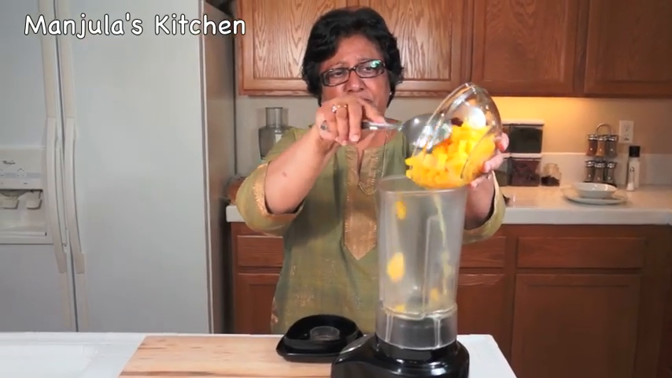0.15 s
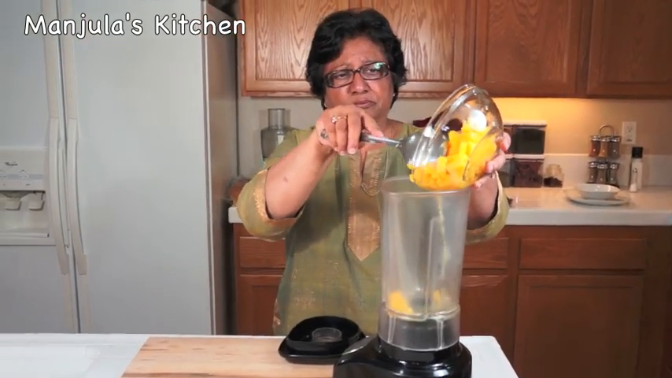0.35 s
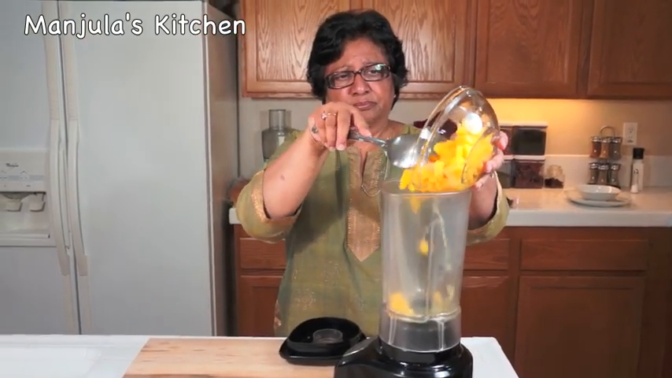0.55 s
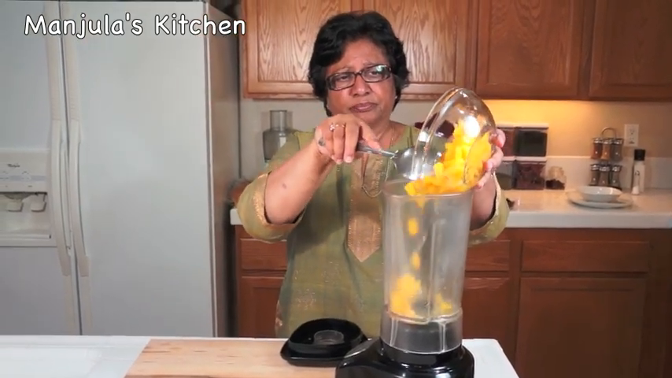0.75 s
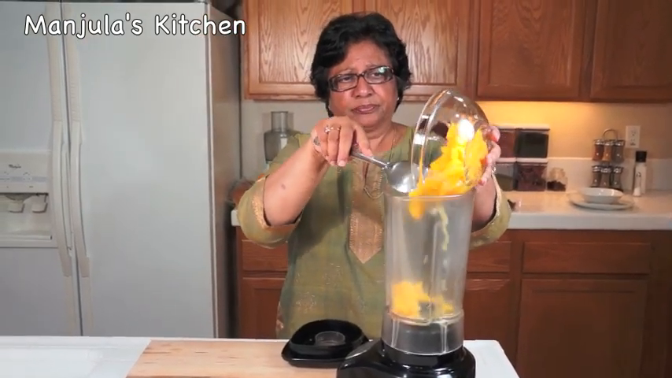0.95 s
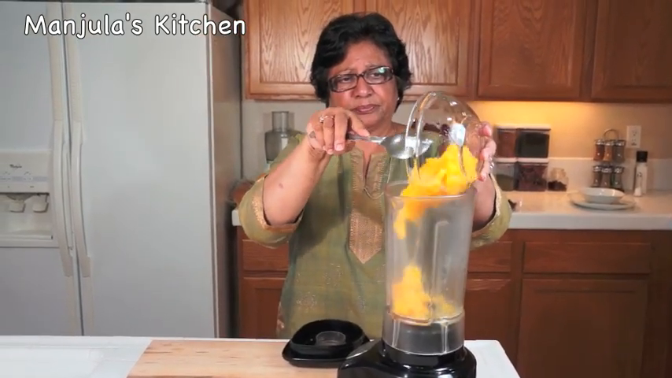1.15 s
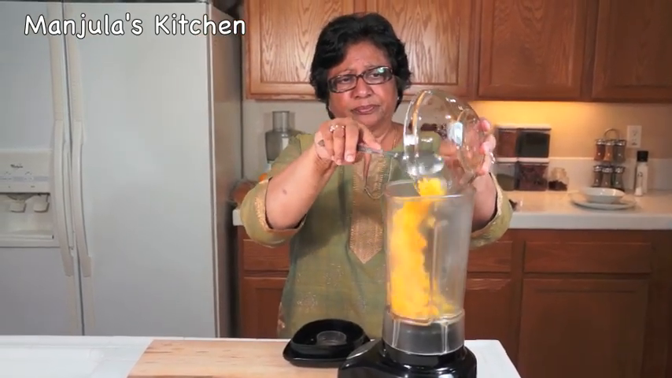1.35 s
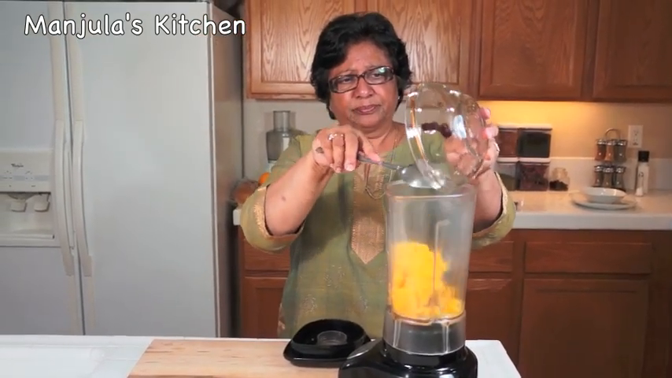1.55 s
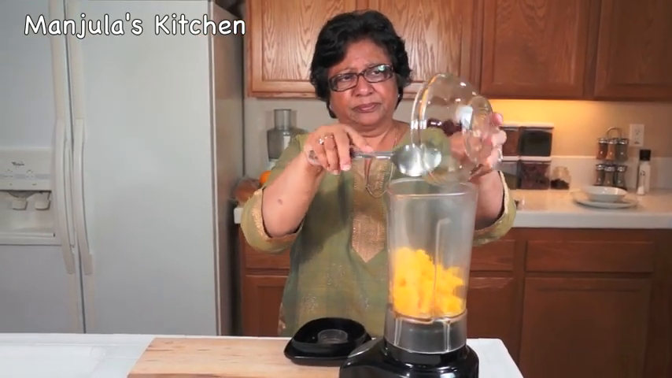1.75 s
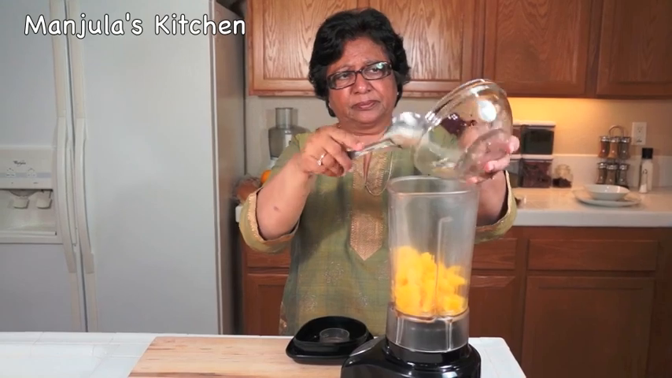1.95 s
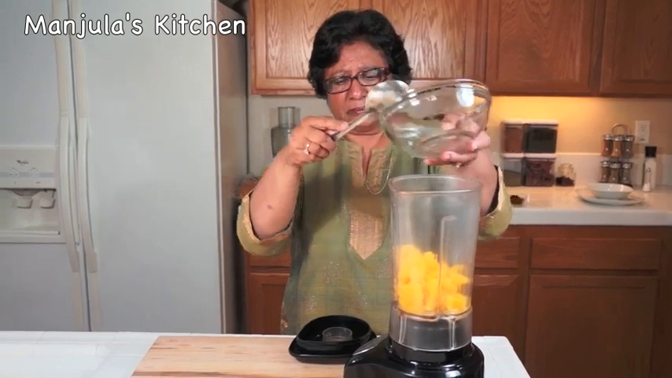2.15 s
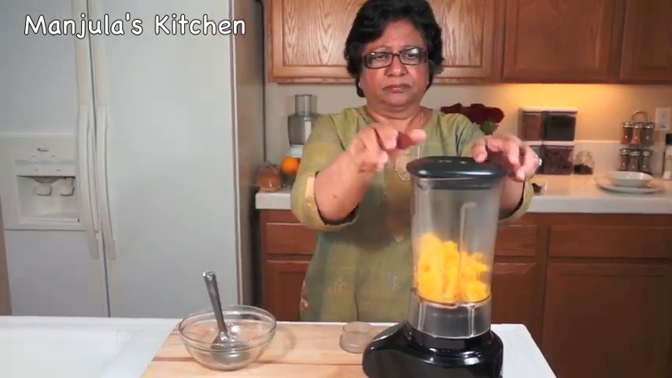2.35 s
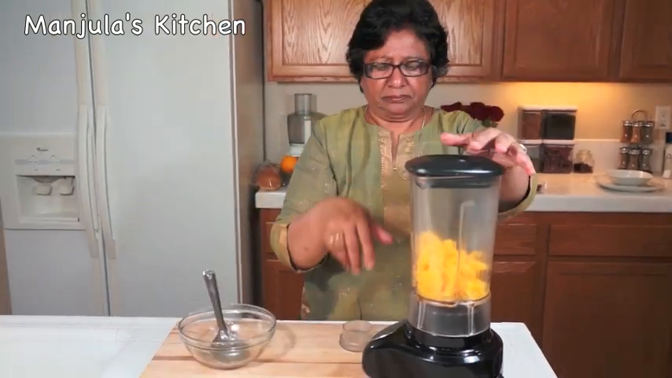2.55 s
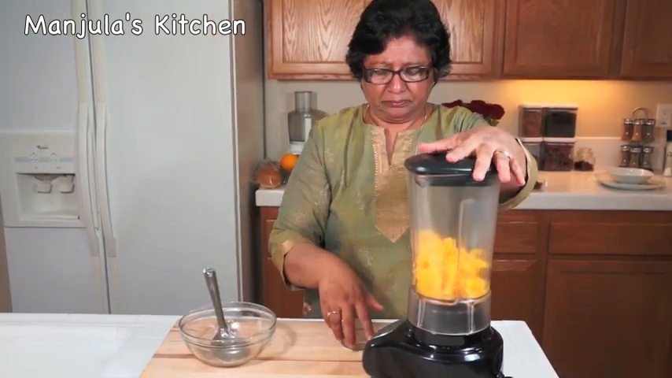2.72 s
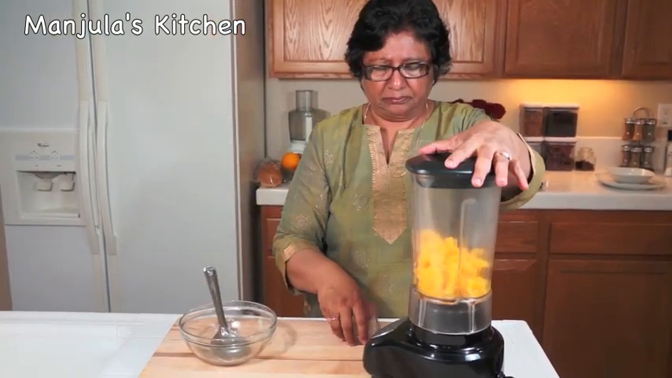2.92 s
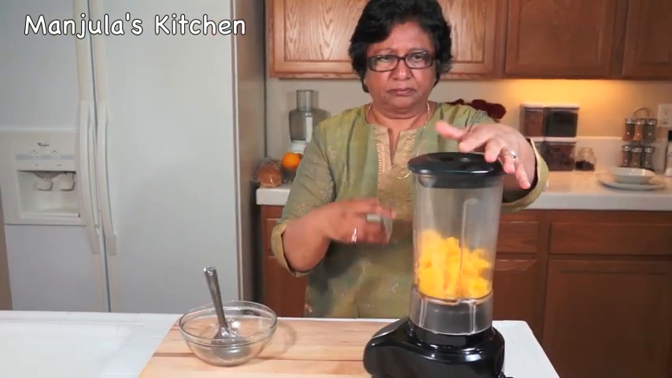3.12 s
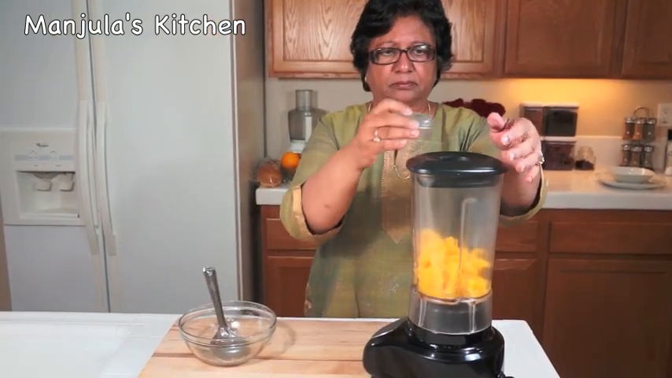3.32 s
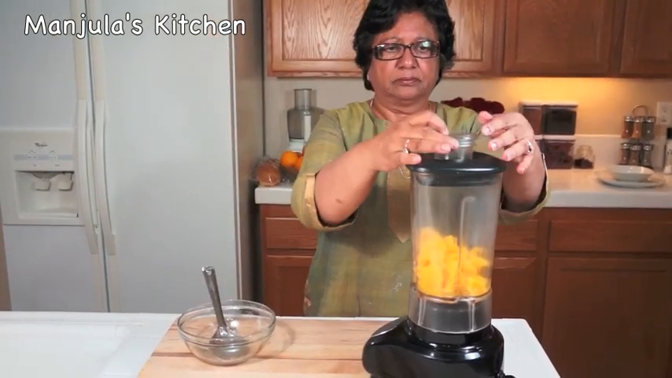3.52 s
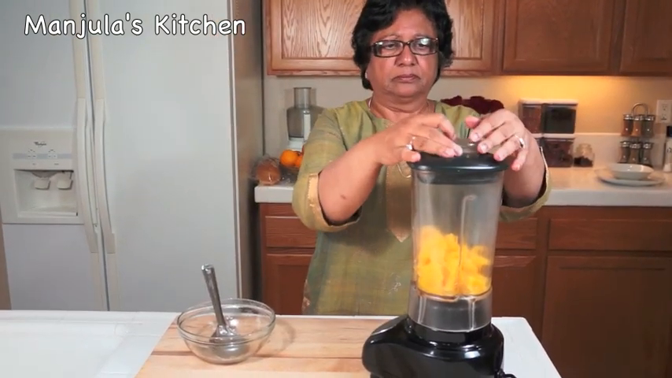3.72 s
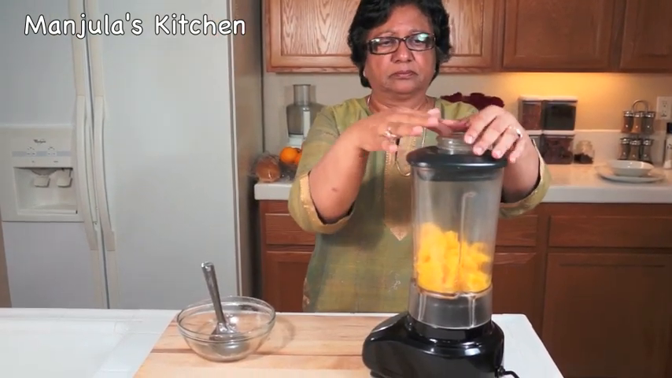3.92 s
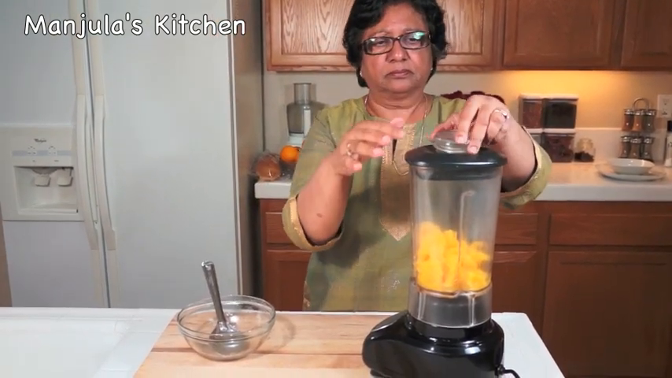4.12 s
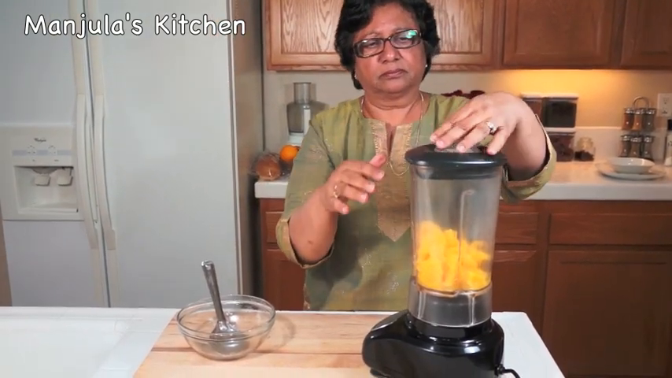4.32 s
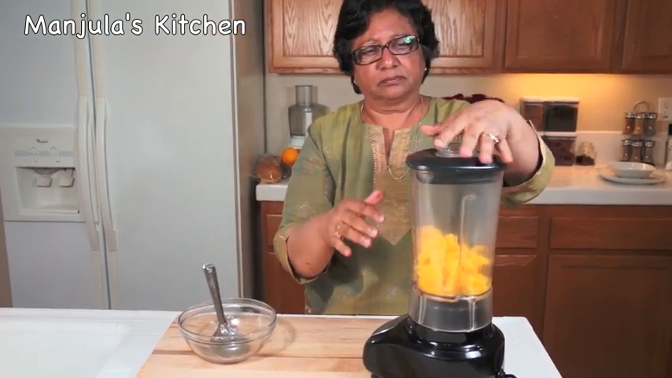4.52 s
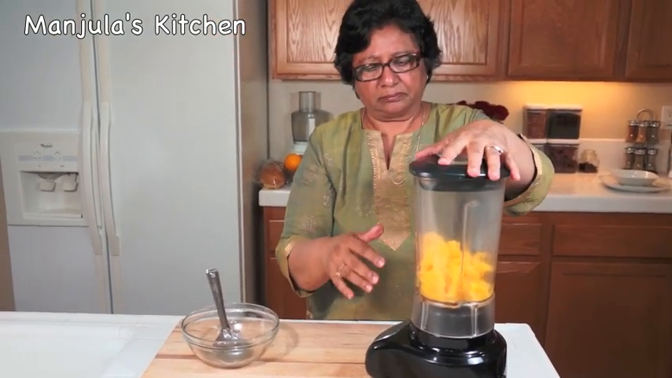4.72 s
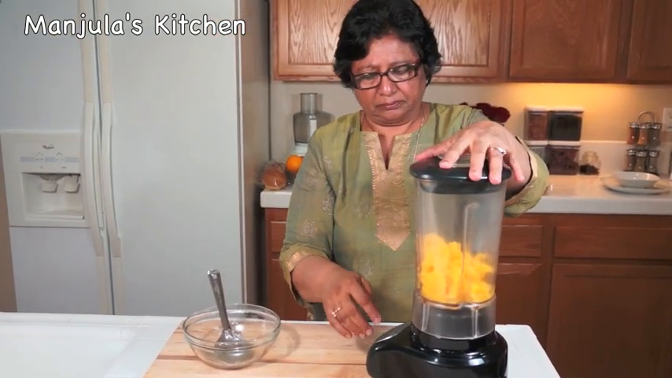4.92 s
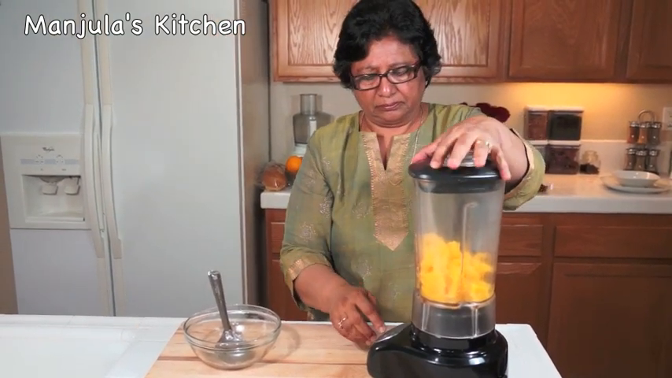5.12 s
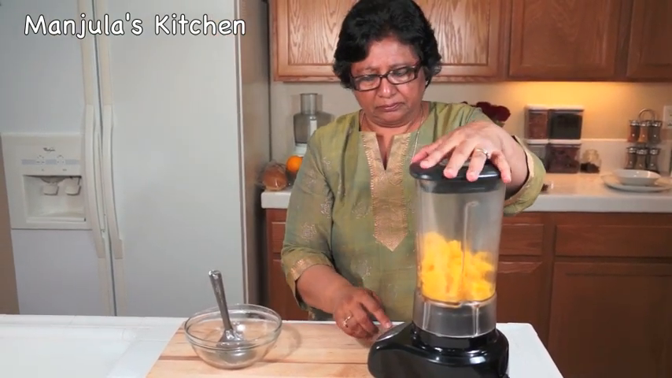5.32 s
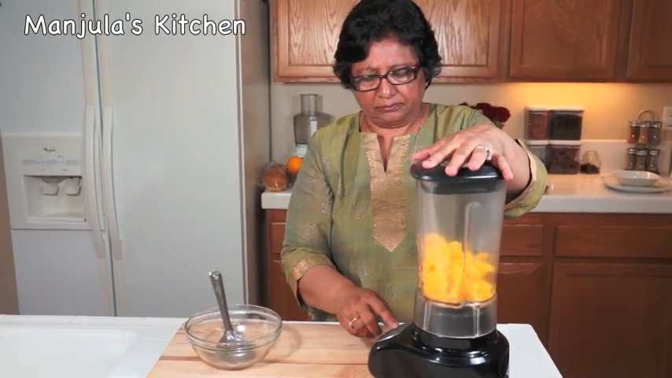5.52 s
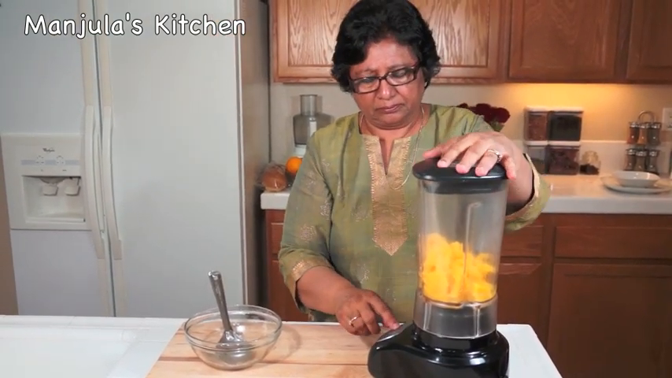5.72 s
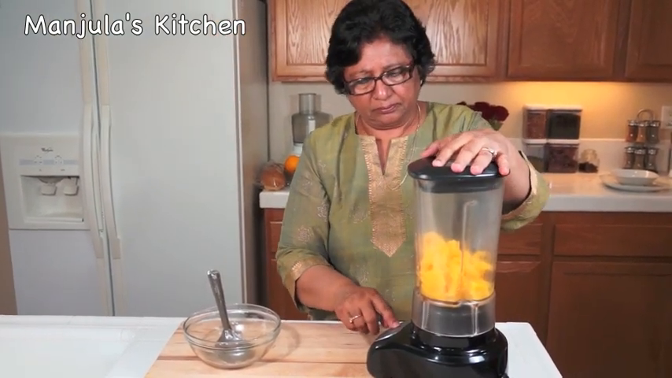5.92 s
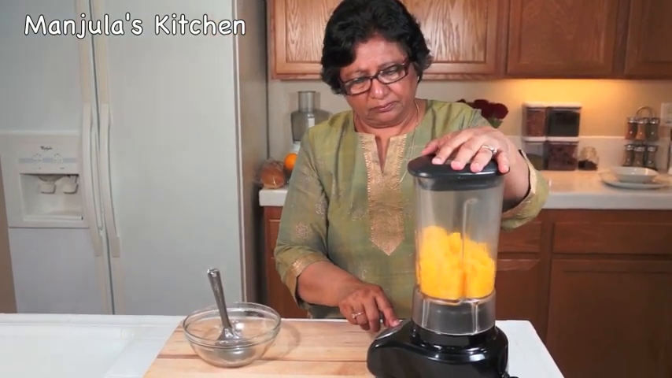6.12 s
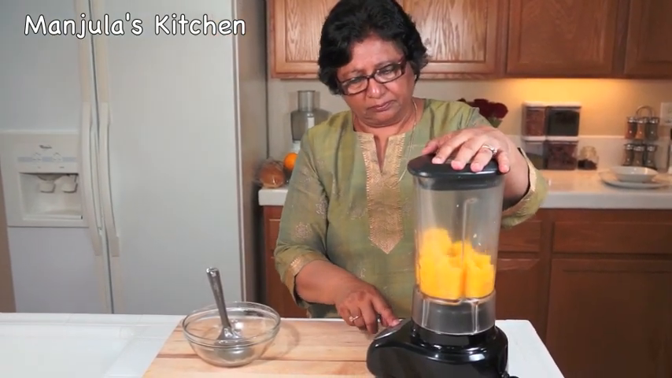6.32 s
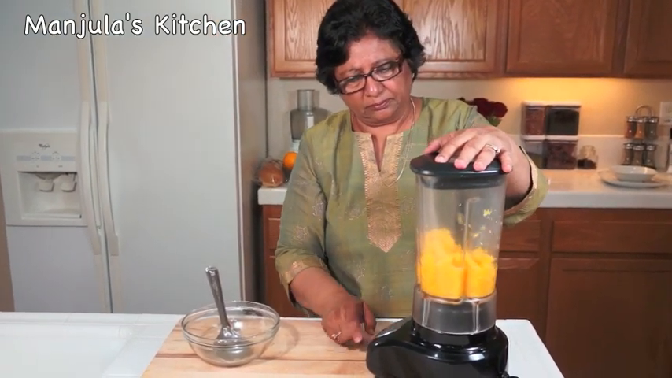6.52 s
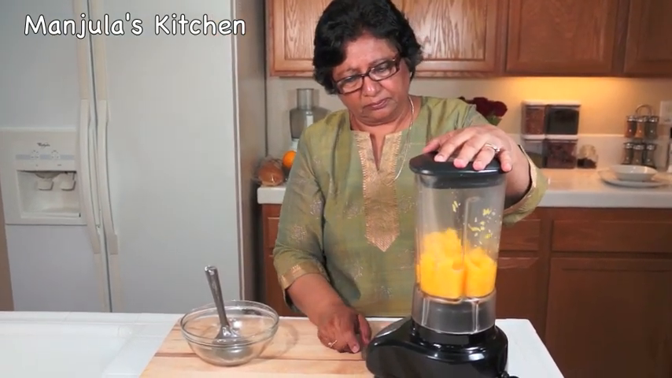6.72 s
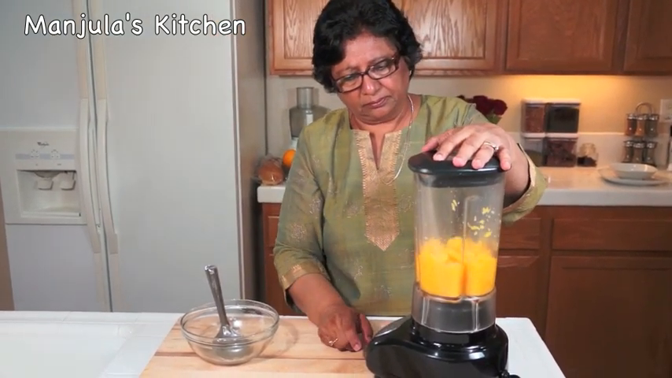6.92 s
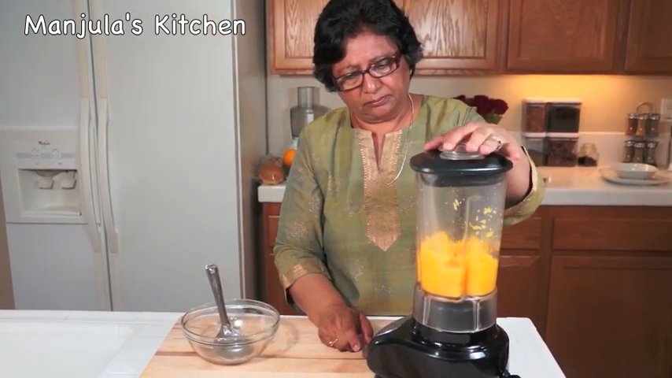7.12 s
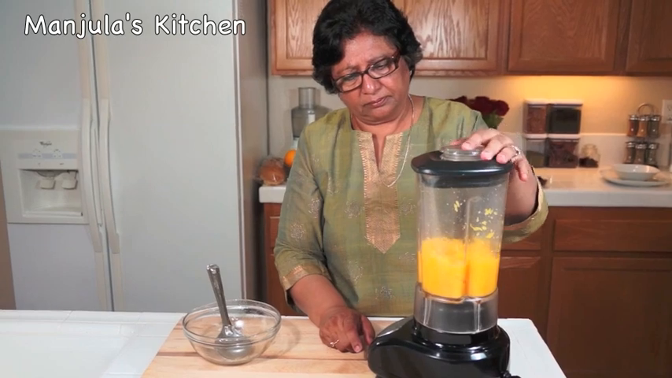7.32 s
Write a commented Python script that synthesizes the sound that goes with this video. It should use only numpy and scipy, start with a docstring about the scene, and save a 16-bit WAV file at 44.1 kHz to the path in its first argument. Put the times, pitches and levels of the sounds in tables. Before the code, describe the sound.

In a humming kitchen, soft fruit drops with spoon squeaks and a glassy clink, lid knocks and button clicks follow, and a blender bursts on.

```python
"""A hard-walled kitchen: diffuse hum throughout, a thin wavering whine until 6.1 s; walls echo all else but the
hum, the whine and the shaft. 0-1.5 s: wet fruit smacks, squeaks and slides on glass (noise bursts, grit); a
spoon rings the bowl (damped modes). At about 2.3 s the level dips briefly: it fades out and comes back quickly.
Hands knock and rub lid and jar (struck resonances, tiny slips), the seal chirps, the jar booms and the hard cap
is tapped (decaying sines). 5.6-6.0 s: button clicks (resonant bursts). 6.1-7.46 s: a blender roars (impacts,
shaft-gated air noise), fruit thuds, the base hums."""
import sys
import numpy as np
from scipy import signal
from scipy.fft import rfft, irfft, next_fast_len
from scipy.io import wavfile
from scipy.ndimage import map_coordinates

SR = 44100
rng = np.random.default_rng(int(sys.argv[2]) if len(sys.argv) > 2 else 0)


def voltage_ratio(level):
    """Linear amplitude factor for a level in decibels (scalar or array-like)."""
    return 10 ** (np.asarray(level, float) / 20)


def store_pcm(level_fs):
    """Save levels as 16-bit WAV."""
    pcm = np.round(np.clip(level_fs, -1, 1) * 32767).astype(np.int16)
    wavfile.write(sys.argv[1], SR, np.atleast_2d(pcm).T)


N = 328765

# hum spectrum: (frequency [Hz], relative density [dB])
HUM_SPECTRUM = [(15, -69), (25, -39), (71, -29.5), (240, -6), (490, -3), (860, -7.5), (1600, -14),
                (3100, -22.5), (5000, -21.5), (6500, -25.5), (8200, -18), (9500, -22.5), (10900, -35),
                (22000, -120)]
# electrical whine: (time [s], mean pitch [Hz], mean level [dB])
WHINE_TRACK = [(0, 7750, -75.5), (1.8, 7750, -75.5), (1.95, 7720, -69.5), (2.2, 7580, -69.5),
               (2.6, 7690, -73), (3.3, 7880, -69), (3.5, 7720, -73), (5.1, 7760, -72), (5.7, 7780, -68.5),
               (5.93, 7800, -68.5), (6.1, 7750, -73.5)]
# swells of the fuzzy band: (start [s], length [s], peak level [dB])
FUZZ_SWELLS = [(1.9, .35, -71), (3.82, .36, -61), (4.25, .35, -62), (5.15, .5, -59), (5.6, .35, -66)]
# wet smacks of spoon and fruit: (time [s], level [dB], centre [Hz], width [octaves])
FRUIT_SMACKS = [(0.065, -25.5, 6600, 0.49), (0.0954, -28, 7500, 0.82), (0.1288, -27.5, 5300, 0.77),
                (0.1794, -45, 5800, 1), (0.2211, -25.5, 7050, 0.49), (0.248, -53, 7800, 0.46),
                (0.389, -41, 7000, 0.26), (0.4498, -36, 7730, 0.25), (0.587, -40, 7380, 0.15),
                (0.7023, -35, 8500, 1), (0.752, -28, 8450, 1), (0.8497, -43, 7280, 1),
                (0.9462, -39, 8360, 0.18), (1.1408, -31, 6650, 1), (1.2744, -37, 9060, 0.32),
                (1.3733, -32, 4170, 1)]
# spoon edge on wet glass: (time [s], level [dB], pitch [Hz], t60 [s])
SPOON_SQUEAKS = [(0.054, -41.5, 1860, 0.096), (0.146, -40, 3600, .08), (0.22, -48, 1120, .08),
                 (0.726, -44, 3360, 0.128), (0.796, -44.5, 1160, 0.044), (0.794, -42.5, 1930, 0.044),
                 (1.003, -43, 4000, 0.156), (1.092, -39, 5370, 0.112), (1.127, -44.5, 3300, .1),
                 (1.199, -41, 4900, 0.07), (1.294, -41.5, 5000, .08), (1.326, -46, 2600, 0.1)]
# fruit sliding on glass: (time [s], level [dB])
FRUIT_SLIDE = [(0.0, -43.5), (0.128, -69), (0.288, -72), (0.518, -60.5), (1.2, -59), (1.398, -51),
               (1.5, -67)]
# spoon on the rim: (time [s], level [dB])
RIM_STRIKES = [(1.513, -21)]
# glass bowl modes: (frequency [Hz], level [dB], t60 [s])
BOWL_MODES = [(824, -12, .17), (1949, -4, .2), (2062, -16, .2), (2450, -11, .08), (2724, -21, .1),
              (3365, -10, .35), (3408, -4, .45), (3461, -4, .24), (5141, -5, .34), (5070, -10, .45),
              (5421, -16, .2), (6080, -21, .2), (7255, -3, .24), (7140, -10, .3), (8010, -13, .22),
              (8450, -20, .2), (9400, -20, .15), (9560, -16, .2), (9720, -18, .18), (9911, -21, .2),
              (10830, -18, .12)]
# knocks on lid and jar: (time [s], body level [dB], clack re body [dB], snap re body [dB])
LID_KNOCKS = [(2.316, -46.5, 9, -9), (2.356, -45.5, 12.5, -13), (2.722, -45, -1, -3),
              (2.761, -36, -30, -12), (2.798, -37, -27, -13), (2.847, -32, -11, -9.5),
              (2.907, -32.5, 0.5, -10), (2.939, -40, 6.5, -11), (3.292, -43, -26, -8),
              (3.515, -26, -5, -23), (3.673, -31.5, -5, -1.5), (3.726, -24.5, 0.5, -6),
              (4.214, -30.5, -4, -25), (4.411, -28, -17, -27), (4.439, -41, -13, -30),
              (4.698, -40, -15, -23), (4.761, -34.5, -3, -9), (4.839, -36.5, -6.5, -22),
              (4.883, -31.5, -2.5, -12), (4.914, -41.5, 4, -2), (4.951, -34, -3.5, -6), (5.149, -42, 2, -5),
              (5.198, -42, -11, -8), (5.294, -36, 2.5, -5), (5.339, -38, 1, -14), (5.638, -40.5, 4.5, -4.5)]
# low modes of lid and jar: (frequency [Hz], width [Hz], level [dB])
LID_LOW_MODES = [(415, 140, 3), (803, 163, 2.5), (1140, 370, -3)]
# upper modes of lid and jar: (frequency [Hz], width [Hz], level [dB])
LID_UPPER_MODES = [(1700, 480, 0), (2420, 1300, 4.5), (3170, 1150, 5)]
# hands and rubber seal rubbing: (start [s], length [s], first level [dB], last level [dB], bright re dull [dB])
RUB_STROKES = [(2.303, 0.057, -55.5, -51.5, 2), (2.727, 0.15, -66, -50.5, -0.5),
               (2.892, 0.023, -54, -45, -3), (3.528, 0.01, -45.5, -48, -12), (3.694, 0.038, -44, -57.5, -8),
               (3.816, 0.29, -57, -68, -11.5), (4.191, 0.039, -58, -40.5, -8.5),
               (4.414, 0.017, -57, -50, -18), (4.767, 0.16, -52, -55, -3), (5.12, 0.23, -70, -48.5, -2.5),
               (5.632, 0.019, -47.5, -47.5, -24), (5.948, 0.084, -62.5, -72, 8.5)]
# wet rubber seal pops: (time [s], level [dB], from [Hz], to [Hz], length [s])
SEAL_POPS = [(2.355, -46, 3630, 1104, 0.019)]
# air shut in the jar: (time [s], level [dB], pitch [Hz])
JAR_BOOMS = [(2.349, -45, 530), (2.801, -45, 242), (2.942, -38, 246), (3.517, -27, 242), (3.673, -30, 244),
             (3.723, -29.5, 149), (4.216, -41.5, 146), (4.223, -39, 240), (4.412, -37, 357),
             (4.415, -48, 151), (4.694, -39, 379), (4.88, -43, 155), (4.95, -54, 160), (5.301, -49, 167),
             (5.638, -34.5, 339)]
# cap struck: (time [s], level [dB])
CAP_TAPS = [(3.516, -47.5), (3.7241, -39), (4.2044, -47.5), (4.2158, -45)]
# hard cap modes: (frequency [Hz], level [dB], t60 [s])
CAP_MODES = [(3400, -7, .05), (5520, -4, .12), (5650, 0, .12), (6780, -4, .08), (8100, -3, .05),
             (8400, -7, .04), (9100, -6, .04)]
# fingertip and button: (time [s], click level [dB], panel level [dB])
BUTTON_CLICKS = [(5.585, -42.5, -25), (5.942, -37, -18), (6.02, -28.5, -10.5)]
# button resonances: (frequency [Hz], width [octaves], level re click [dB])
BUTTON_MODES = [(4900, 0.45, -7), (8200, 0.22, -1.5)]
# panel resonance: (frequency [Hz], width [octaves])
PANEL_MODE = (1450, 0.64)
# shaft turning: (time [s], mean rate [turns/s], mean level of the base's hum [dB])
SHAFT_TRACK = [(6.11, 150, -71), (6.95, 168, -70), (7.08, 151, -57), (7.3, 163, -57.5), (7.4, 165, -63),
               (7.455, 260, -72)]
# big pieces on the jar wall: (time [s], level [dB], centre [Hz])
BIG_PIECES = [(6.124, -9.5, 1710), (6.164, -11.5, 1320), (6.289, -10, 1160), (6.595, -12, 1340),
              (6.934, -9, 1620), (7.02, -6.5, 1650), (7.045, -11, 1090), (7.08, -10, 1360),
              (7.129, -6.5, 1400), (7.224, -13, 1310), (7.33, -5, 1280)]
# blender load: (time [s], mean roar level [dB], bright re low band [dB])
MOTOR_TRACK = [(6.112, -24, 4), (6.14, -22.5, -0.5), (6.26, -23, -3), (6.43, -27.5, -2.5), (6.5, -22, -1.5),
               (6.55, -26, -1.5), (6.8, -24.5, -4), (6.96, -24, 0.5), (7.13, -23.5, 0.5), (7.455, -25, 1)]
# roar through the jar: (frequency [Hz], relative density [dB])
JAR_SPECTRUM = [(24, -75), (40, -50), (91, -42), (156, -33), (211, -30), (363, -5), (593, -9), (1170, -2),
                (1870, -8), (2720, -8), (3870, -13.5), (4670, -9.5), (5910, -14), (8400, -7),
                (10900, -21.5), (14100, -58.5), (22000, -120)]
# housing resonances: (frequency [Hz], width [Hz], level, unused [dB])
HOUSING_MODES = [(1290, 250, 0), (4830, 200, -7), (5430, 140, -9), (9000, 320, -8)]
# wall echo: (frequency [Hz], t60 [s])
WALL_DECAY = [(150, 0.45), (500, 0.53), (2000, 0.57), (5000, 0.43), (10000, 0.45)]
# left-right likeness: (frequency [Hz], likeness [0..1])
STEREO_LIKENESS = [(60, 0.72), (170, 0.99), (470, 0.93), (1320, 0.64), (3710, 0.18), (10400, 0.033)]
# stereo lean: (frequency [Hz], left minus right [dB])
STEREO_LEAN = [(60, 1), (330, -0.5), (1870, -0.5), (10400, -1)]
# the level dips briefly at about 2.3 s, fading out and quickly back in: (time [s], level [dB])
LEVEL_DIP = [(0, 0.5), (2.2, -2), (2.26, -9), (2.298, -28), (2.31, -10.5), (2.33, -2.5)]


def unit(x):
    """Scaled to rms 1."""
    return x / np.sqrt(np.mean(x ** 2) + 1e-20)


def along(points, hz):
    """(Hz, value) points interpolated on a log frequency axis."""
    f, v = np.transpose(points)
    return np.interp(np.log(hz + 1), np.log(f + 1), v)


def curves(rows):
    """One value per sample for each column, then a gate: 1 inside the time span, else 0."""
    s, *cols = np.transpose(rows)
    t = np.arange(N) / SR
    gate = (t >= s[0]) * (t <= s[-1])
    return [np.interp(t, s, c) for c in cols] + [gate]


def wobble(knots_per_s):
    """A smooth random curve through normal knots."""
    knots = rng.standard_normal(int(N * knots_per_s / SR) + 4)
    return map_coordinates(knots, [np.arange(N) * knots_per_s / SR])


def filtered(x, response):
    """x times a complex response of frequency."""
    m = next_fast_len(x.shape[-1] + 8192)
    return irfft(rfft(x, m) * response(np.fft.rfftfreq(m, 1 / SR)), m)[..., :x.shape[-1]]


def low_cut(corner_hz, order):
    """Causal high-pass response."""
    return lambda hz: (1j * hz / (corner_hz + 1j * hz)) ** order


def peaks(table):
    """Causal response of (Hz, width Hz, dB) resonances, summed with alternating sign."""
    def response(f):
        total = 0
        for k, (c, w, db) in enumerate(table):
            total = total + (-1) ** k * voltage_ratio(db) * 1j * f * w / (c * c - f * f + 1j * f * w)
        return total
    return response


def grit(per_s, spread_db):
    """Random tiny impacts of uneven size, rms 1."""
    hits = rng.random(N) < per_s / SR
    sizes = rng.standard_normal(N) * voltage_ratio(spread_db * rng.exponential(size=N))
    return unit(hits * sizes)


def pair(x):
    """Two unrelated signals made into left and right, alike in the bass."""
    def turn(hz):
        return np.arccos(np.clip(along(STEREO_LIKENESS, hz), 0, 1)) / 2
    mid = filtered(x[..., 0, :], lambda hz: np.cos(turn(hz)))
    side = filtered(x[..., 1, :], lambda hz: np.sin(turn(hz)))
    return np.stack([mid + side, mid - side], axis=-2)


def ring(modes, t, blur):
    """Damped modes, each level drawn afresh and its phase drifting at random."""
    out = 0
    for hz, db, t60_s in modes:
        drift = blur * np.cumsum(rng.standard_normal(len(t))) / np.sqrt(SR)
        level = voltage_ratio(db + rng.normal(0, 1.5) - 60 * t / t60_s)
        out = out + level * np.sin(2 * np.pi * hz * t + drift)
    return out


def puffs(table, t60s_s, attack_s=0.0024):
    """Short noise bursts, each through its own resonance twice over."""
    out, t = np.zeros(N + SR), np.arange(SR // 6) / SR
    for (s, db, hz, octaves), t60_s in zip(table, t60s_s):
        puff = voltage_ratio(-60 * t / t60_s) * (1 - np.exp(-t / attack_s)) * rng.standard_normal(len(t))
        resonance = peaks([(hz, hz * np.clip(octaves, .03, 3), 0)])
        burst = filtered(puff, lambda f: resonance(f) ** 2)
        out[round(s * SR):][:len(t)] += voltage_ratio(db) * burst / np.abs(burst).max()
    return out[:N]


def hum():
    """Diffuse appliance hum: shaped stereo noise, slowly uneven."""
    noise = rng.standard_normal((2, N))
    shaped = unit(pair(filtered(noise, lambda hz: voltage_ratio(along(HUM_SPECTRUM, hz)))))
    return voltage_ratio(-54.5 + .7 * wobble(6)) * shaped


def whine():
    """Wavering sine, and a fuzzy band near half its pitch that swells now and then."""
    t = np.arange(N) / SR
    hz, db, on = curves(WHINE_TRACK)
    phase = 2 * np.pi * np.cumsum(hz + 45 * wobble(90)) / SR
    swell = voltage_ratio(-73)
    for s, length_s, top_db in FUZZ_SWELLS:
        swell = swell + voltage_ratio(top_db) * np.sin(np.pi * np.clip((t - s) / length_s, 0, 1))
    fuzz = swell * np.sin(phase / 2.03) * unit(wobble(320))
    return on * (voltage_ratio(db + 2.2 * wobble(20)) * np.sin(phase) + fuzz)


def rubbing():
    """Tiny slips, dull and bright; each stroke takes hold quickly and trails off more slowly."""
    grip_s, slip_off_db_per_s = 0.02, 246
    t, slips, out = np.arange(N) / SR, grit(1600, spread_db=1.3), 0
    dull = unit(filtered(slips, peaks([(553, 830, -5), (1400, 1440, -7)])))
    bright = unit(filtered(slips, peaks([(4000, 1870, 0.73), (8620, 1200, 0.27)])))
    for s, length_s, first_db, last_db, bright_db in RUB_STROKES:
        level_db = np.interp(t, [s, s + length_s], [first_db, last_db])
        level_db = level_db - slip_off_db_per_s * np.maximum(t - s - length_s, 0)
        grip = np.clip((t - s) / grip_s + 1, 0, 1) ** 2
        out = out + grip * voltage_ratio(level_db) * (dull + voltage_ratio(bright_db) * bright)
    return out * voltage_ratio(2.35 * wobble(30))


def seal():
    """The wet seal pops: a short falling chirp under a half-sine envelope."""
    out = np.zeros(N)
    for s, db, from_hz, to_hz, length_s in SEAL_POPS:
        u = np.linspace(0, 1, int(length_s * SR))
        hz = from_hz * (to_hz / from_hz) ** u
        out[round(s * SR):][:len(u)] += voltage_ratio(db) * np.sin(np.pi * u) * np.sin(2 * np.pi * np.cumsum(hz) / SR)
    return out


def jar():
    """Soft-edged booms of trapped air: decaying sines."""
    out, t = np.zeros(N), np.arange(SR // 3) / SR
    for s, db, hz in JAR_BOOMS:
        envelope = voltage_ratio(db - 60 * t / .085) * (1 - np.exp(-t / .0015))
        out[round(s * SR):][:len(t)] += envelope * np.sin(2 * np.pi * hz * t)
    return out


def cap():
    """The hard cap's modes ring briefly when struck."""
    out, t = np.zeros(N), np.arange(SR // 3) / SR
    for s, db in CAP_TAPS:
        out[round(s * SR):][:len(t)] += voltage_ratio(db) * ring(CAP_MODES, t, blur=24)
    return out


def button():
    """Every click sounds the button's two resonances and, at its own level, the duller panel."""
    clicks = []
    for s, db, panel_db in BUTTON_CLICKS:
        for hz, octaves, mode_db in BUTTON_MODES + [(*PANEL_MODE, panel_db)]:
            clicks.append((s, db + mode_db, hz, octaves))
    return puffs(clicks, [.055] * len(clicks), attack_s=.001)


def hands():
    """A knock, a short noise blow, excites the lid's low and upper modes and a bright snap."""
    out, t = np.zeros(N), np.arange(SR // 3) / SR
    low, upper = peaks(LID_LOW_MODES), peaks(LID_UPPER_MODES)
    sharp = peaks([(5000, 3000, -3), (8500, 4000, 0)])

    def struck(blow, response):
        x = filtered(blow, response)
        return x / np.abs(x).max()

    for s, db, clack_db, snap_db in LID_KNOCKS:
        blow = (1 - np.exp(-t / 0.00091)) * voltage_ratio(-60 * t / 0.022) * rng.standard_normal(len(t))
        body = struck(blow, lambda f: low(f) / (1 + 1j * f / 1800))
        clack = struck(blow, lambda f: upper(f) / (1 + 1j * f / 3500))
        snap = struck(blow, lambda f: sharp(f) ** 2)
        out[round(s * SR):][:len(t)] += voltage_ratio(db) * (body + voltage_ratio(clack_db) * clack + voltage_ratio(snap_db) * snap)
    return out


def bowl():
    """The spoon rings the hand-damped glass, with a short resonant noise crack."""
    out, t = np.zeros(N), np.arange(SR) / SR
    crack_modes = peaks([(940, 33, 7.9), (2600, 430, 11.6), (6960, 6400, 2.3)])
    for s, db in RIM_STRIKES:
        crack = filtered(voltage_ratio(-60 * t / 0.049) * rng.standard_normal(len(t)), crack_modes)
        out[round(s * SR):][:len(t)] += voltage_ratio(db) * (ring(BOWL_MODES, t, blur=14.6) + 0.83 * crack)
    return filtered(out, low_cut(450, order=2))


def smacks():
    """Wet fruit and spoon: short resonant noise bursts."""
    return puffs(FRUIT_SMACKS, [.055] * len(FRUIT_SMACKS), attack_s=0.0027)


def squeaks():
    """The spoon's edge on wet glass: narrow noise bursts."""
    bursts = [(s, db, hz, .16) for s, db, hz, t60_s in SPOON_SQUEAKS]
    return puffs(bursts, [row[3] for row in SPOON_SQUEAKS], attack_s=0.0046)


def slide():
    """Fruit sliding on glass: crackle of tiny impacts through two resonances."""
    db, on = curves(FRUIT_SLIDE)
    crackle = filtered(grit(1500, spread_db=-0.5), peaks([(4140, 3300, 0.5), (8900, 1400, 7)]))
    return on * voltage_ratio(db + 2.0 * wobble(25.87)) * unit(crackle)


def shaft():
    """The base hums at the turning rate, pitch and level unsteady."""
    hz, db, on = curves(SHAFT_TRACK)
    phase = 2 * np.pi * np.cumsum(hz * (1 + .015 * wobble(8))) / SR
    return on * voltage_ratio(db + 2.4 * wobble(13)) * np.sin(phase)


def pieces(count=14):
    """Fruit thuds on the jar wall: big pieces as listed, and count smaller ones by chance."""
    start_s, end_s = MOTOR_TRACK[0][0], MOTOR_TRACK[-1][0]
    thuds = [(s, db, hz, 0.59) for s, db, hz in BIG_PIECES]
    for k, (a, b, c) in enumerate(rng.random((count, 3))):
        s = start_s + (end_s - start_s) * (k + a) / count  # one per equal slot
        thuds.append((s, -18.5 + 6 * (b - .5), 1250 * 1.27 ** (c - .5), 0.59))
    return puffs(thuds, [.05] * len(thuds))


def blender():
    """Blades hit fruit as dense impacts over shaft-gated air noise; the jar colours both, the load makes it surge."""
    roar_db, bright_db, on = curves(MOTOR_TRACK)
    shaft_hz = curves(SHAFT_TRACK)[0]
    turns = 2 * np.pi * np.cumsum(shaft_hz * (1 + 0.01416 * wobble(5))) / SR
    air = (1 + .3 * np.cos(turns)) * rng.standard_normal(N)
    drive = air + .6 * grit(2500, spread_db=1.2)
    housing = peaks([(c, w, 0) for c, w, db in HOUSING_MODES])

    def colour(hz):
        return voltage_ratio(along(JAR_SPECTRUM, hz)) * (1.5 + 0.5 * np.abs(housing(hz)))

    def low_share(hz):
        return 1 / (1 + (hz / 3000) ** 4)

    low = unit(filtered(drive, lambda hz: colour(hz) * np.sqrt(low_share(hz))))
    high = unit(filtered(drive, lambda hz: colour(hz) * np.sqrt(1 - low_share(hz))))
    low = voltage_ratio(0.99 * wobble(35)) * low
    high = voltage_ratio(bright_db + 0.33 * wobble(28)) * high
    roar = voltage_ratio(roar_db + 1.6 * wobble(22)) * (low + high)
    return filtered(on * roar, low_cut(70, order=1))


def kitchen(x):
    """Wall echo: decaying noise, drawn anew for each stretch of sound; every frequency dies at its own speed."""
    size, first_wall = 8192, 180  # samples; the first wall is 4 ms late
    count = -(-N // size)
    hz, t, z = signal.stft(rng.standard_normal((count, 2, SR * 3 // 4)), SR, nperseg=256)
    decay = voltage_ratio(-60 * t / along(WALL_DECAY, hz)[:, None])
    tails = pair(signal.istft(z * decay, SR, nperseg=256)[1])
    tails = tails / np.sqrt(np.mean(np.sum(tails ** 2, axis=-1)))
    stretches = np.pad(x, (0, count * size - N)).reshape(count, 1, size)
    wet = signal.fftconvolve(stretches, tails, axes=2)
    out = np.zeros((2, N + 2 * SR))
    for k in range(count):
        out[:, k * size + first_wall:][:, :wet.shape[2]] += wet[k]
    return out[:, :N]


def scene():
    """All sources, direct and off the walls; small things radiate no deep bass."""
    small = smacks() + squeaks() + slide() + bowl() + hands() + rubbing() + button() + seal() + jar() + cap()
    small = filtered(small, low_cut(81, order=3))
    roar, thuds = blender(), pieces()
    left_right_db = [[-1.5], [-.6]]
    direct = small + voltage_ratio(left_right_db) * (roar + thuds) + shaft()
    echo = kitchen(voltage_ratio(4.5) * small + voltage_ratio(2.62) * roar + voltage_ratio(-3) * thuds)
    return direct + filtered(echo, low_cut(98.5, order=3)) + hum() + whine()


def top_cut(x):
    """Nothing passes above the cut-off."""
    return signal.sosfilt(signal.butter(12, 11020, fs=SR, output="sos"), x)


def record(dry):
    """The brief dip in level, the microphones' lean, a low cut and a sharp band limit."""
    top_hz = 11025

    def response(hz):
        lean = voltage_ratio(along(STEREO_LEAN, hz) * np.array([[.5], [-.5]]))
        return lean * (hz < top_hz) * low_cut(60, order=1)(hz)

    mix = filtered(dry * voltage_ratio(curves(LEVEL_DIP)[0]), response)
    return top_cut(mix)


dry = scene()
out = record(dry)
store_pcm(out)
```